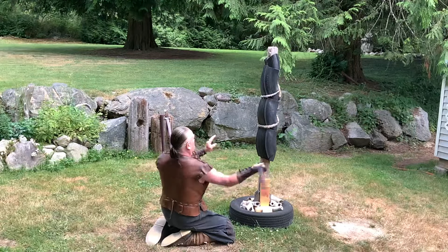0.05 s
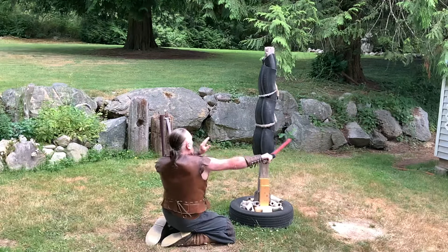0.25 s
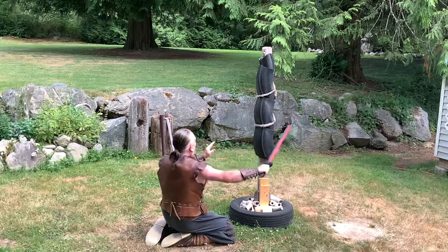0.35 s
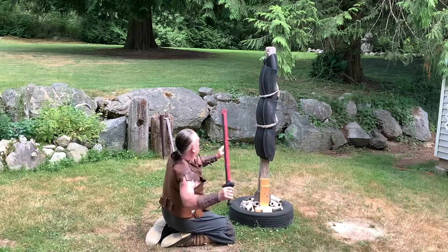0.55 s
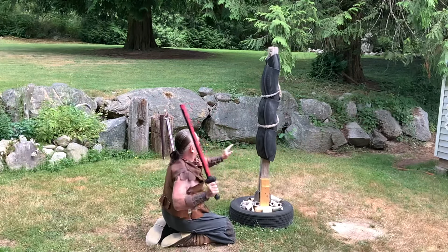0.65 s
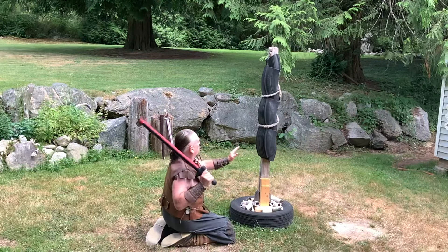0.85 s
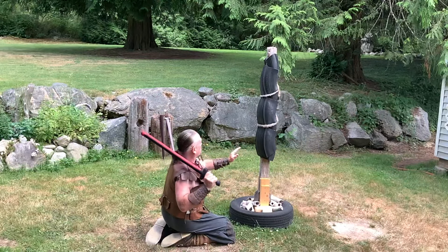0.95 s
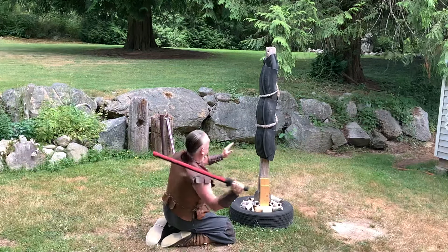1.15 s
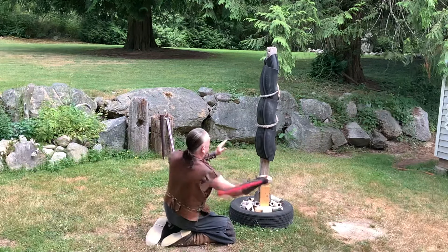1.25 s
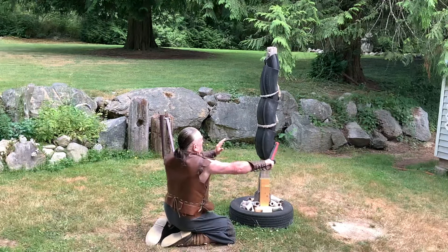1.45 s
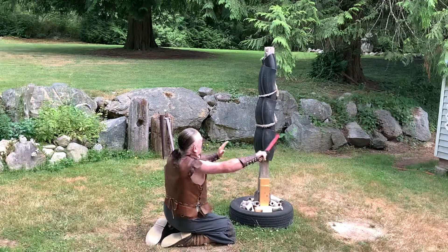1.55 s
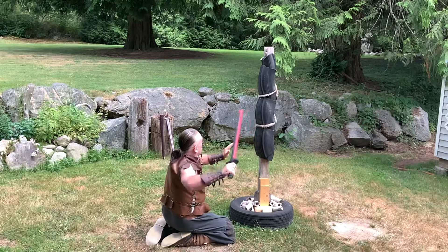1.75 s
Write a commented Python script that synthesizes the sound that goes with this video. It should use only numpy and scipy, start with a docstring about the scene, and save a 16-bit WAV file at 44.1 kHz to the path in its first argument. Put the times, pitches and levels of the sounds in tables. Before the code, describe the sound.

Two sharp smacks of a practice sword land on a padded post outdoors, the second brighter. After each, the post rings briefly and knocks softly in its tyre base, with a faint rumble and hiss behind.

```python
"""Two sharp slaps, each with a short ring and a soft knock after it, over low rumble and a faint
background hiss whose treble drops out and comes back.
A practice sword hits a padded wooden post on an open lawn. Each blow grazes the cover, slaps the
padding and rings post and blade; the cover cracks as the padding bottoms out, and the post rocks in
its tyre base. Rocks, trees and a house wall scatter the sound."""
import sys
import numpy as np
from scipy import signal
from scipy.fft import rfft, irfft
from scipy.io import wavfile

SR = 44100
rng = np.random.default_rng(int(sys.argv[2]) if len(sys.argv) > 2 else 0)


def inscribe(sig):
    """Save sig as 16-bit PCM at rate SR to the path in sys.argv[1].

    A 1-D sig is mono; a 2-D sig holds one channel per row.
    Samples are clipped to [-1, 1] before scaling.
    """
    pcm = np.round(np.clip(np.atleast_2d(sig).T, -1, 1) * 32767)
    wavfile.write(sys.argv[1], SR, pcm.astype(np.int16))


N = 79380

# microphone pair: freq_hz, left_right_db, left_lead_rad, near_coherence, scattered_coherence
MIC_PAIR = [(90, -0.5, -0.01, 0.91, 0.97), (280, -1.5, 0.44, 0.92, 1), (550, -0.5, 1, .9, .55),
            (1050, 2.5, -0.44, 0.22, .25), (2100, -4, -2, 0.85, 0.067), (4000, -4, -1.25, .2, .15),
            (7000, 0.5, -1.5, .15, 0.21), (14000, 0, 4, 0.24, .15)]
# background spectra: freq_hz, density_db
RUMBLE_COLOUR = [(20, -17), (40, -9), (60, -4), (80, -3.5), (130, -11), (250, -26.5), (600, -40)]
MID_HISS_COLOUR = [(100, -2.5), (400, 1), (1000, 3), (1500, -5.5), (2400, -0.5), (4000, -14.5), (7000, -27),
                   (15000, -17.5)]
TREBLE_HISS_COLOUR = [(300, -17), (1000, -6), (1500, -2.5), (3200, 0), (5500, -8), (9000, -9.5),
                      (14500, -6.5), (16000, -21)]
# background hiss levels: time_s, level_db
MID_HISS_LEVEL = [(0, -69.5), (.2, -64.5), (.45, -60.5), (.62, -61.5), (1.0, -71), (1.11, -72.5),
                  (1.219, -64.5), (1.42, -67.5), (1.8, -62.5)]
TREBLE_HISS_LEVEL = [(0, -91), (.1, -79.5), (.17, -67), (0.299, -57.5), (.48, -99), (0.538, -60.5),
                     (.64, -57.5), (.85, -63), (1.01, -65), (1.1, -81), (1.21, -69), (1.29, -78.5),
                     (1.41, -67), (1.67, -71), (1.73, -76), (1.8, -71)]  # drops out and comes back
# small noises: start_s, level_db, rise_s, t60_s
KNOCKS = [(.327, -39, 0.0015, 0.076), (.35, -48.5, 0.003, 0.26), (1.599, -41, 0.0025, 0.17),
          (1.636, -53, 0.0023, 0.27)]
RUBS = [(.405, -59.5, 0.00062, 0.036), (1.217, -59.5, .002, 0.065), (1.597, -46.5, 0.0068, 0.11)]  # blade cover and grip
RUSTLE = [(1.675, -63, .07, 3)]  # sword drawn back
SQUEAK = [(1.188, -60, .026, .1)]
# their spectra: freq_hz, density_db
KNOCK_COLOUR = [(60, -22), (150, -13), (260, 3.5), (400, -5), (750, -4.5), (1300, -12.5), (2200, -15),
                (5000, -24), (9000, -42), (16000, -48)]
RUB_COLOUR = [(200, -18.5), (1500, -9), (3300, -4.5), (5500, -15), (9000, -10), (14500, -8), (16500, -16)]
RUSTLE_COLOUR = [(2000, -37), (4200, -5), (5300, 5), (6700, 1.5), (7900, -3.5), (9000, -37), (16000, -32)]
SQUEAK_COLOUR = [(1300, -46), (1530, -16), (1610, 2), (1700, -12), (2000, -50)]
# low bumps after the blows: start_s, pitch_hz, level_db, rise_s, t60_s
BUMPS = [(.328, 281, -42.5, 0.008, 0.036), (0.486, 237.6, -54.5, 0.011, 0.19),
         (0.521, 302.6, -57, 0.0061, .2), (0.512, 130, -56.5, .02, 0.15), (.67, 150, -57.5, 0.0138, 0.15),
         (1.599, 259, -37.5, 0.0096, 0.067), (1.635, 246.7, -43.5, 0.0027, 0.15)]
# garden echoes: freq_hz, density_db, t60_s
SCATTER_BANDS = [(70, -24.5, 0.3), (150, -6, 0.29), (280, 3.5, .24), (410, 1, 0.27), (620, 0, .22),
                 (960, 2, .22), (1410, -8.5, 0.2), (2300, -4, 0.18), (3400, -13, 0.18), (5000, -17.5, 0.22),
                 (7600, -24.5, .2), (11060, -29.5, .2), (16000, -28.5, 0.19)]
# post and blade modes: pitch_hz, t60_s, left_right_db, first_blow_db, second_blow_db
MODES = [(170, .12, 0, -38, -24.5), (281.5, 0.057, -0.5, -12, -14.5), (300.8, .2, 0, -30, -37),
         (478, .08, 2.5, -19, -21.5), (523, 0.054, -2, -27, -16.5), (641.5, .1, 4, -18, -17),
         (854.5, .17, 2, -26, -25), (880, 0.057, 7.5, -13.5, -24), (1033, 0.15, 4.5, -24.5, -22),
         (1121, .14, 4, -32.5, -25.5), (1753, .14, -5.5, -31.5, -28.5), (2162, 0.27, -4, -32.5, -27.5),
         (2296, 0.12, -6, -27.5, -27.5), (2450, .07, -8.5, -32.5, -23), (3165, .11, -6, -32.5, -33),
         (3385, .1, -1.5, -38.5, -27)]
# spectra of the parts of a blow: freq_hz, density_db
SWISH_COLOUR = [(80, -6), (250, -3.5), (700, -10.5), (2300, -8.5), (5000, -19), (15000, -30.5)]
GRAZE_COLOUR = [(100, -31.5), (300, -2), (600, 1.5), (900, -0.5), (2000, -7), (4500, -8.5), (7000, -17),
                (11000, -13), (14500, -17.5), (16500, -29)]
SLAP_COLOUR = [(100, -37), (300, -17), (600, -8.5), (950, -2), (1400, -3.5), (2400, 0), (3600, -5),
               (5200, -10), (7500, -17.5), (11000, -17.5), (14500, -18), (16500, -29)]
CRACK_COLOUR = [(300, -16), (1500, -3), (4000, 1.5), (7000, -10), (10000, -5.5), (14000, -2), (16000, -13)]
BASE_COLOUR = [(20, -15.5), (40, -6.5), (60, -4), (90, -7.5), (130, -10.5), (220, -22), (600, -58.5)]
# sword blows: start_s, slap_db, slap_rise_s, slap_t60_s, tilt_db_per_octave, graze_lead_s, graze_db,
# ring_lead_s, push_s, crack_lag_s, crack_db, scatter_db, base_db
BLOWS = [(0.2275, -20.5, .0025, .05, -0.5, .0049, -21, .0022, 0.0074, .0025, -29, -24.5, -39),
         (1.4755, -16, 0.00054, 0.031, 1.5, 0.005, -38, -.0002, 0.0075, 0.00246, -20.5, -22, -39.5)]

TIME_S = np.arange(N) / SR
SIDE = np.array([[.5], [-.5]])  # left, right


def undb(db):
    """Decibels to amplitude."""
    return 10 ** (np.asarray(db) / 20)


def across(table, column=1):
    """Table column interpolated over all FFT bins, in log frequency."""
    rows = np.array(table, float)
    return np.interp(np.log(np.arange(N // 2 + 1) * SR / N + 1), np.log(rows[:, 0]), rows[:, column])


def mic_spectra(colour, near):
    """Spectra of coloured noise, partly coherent between the two microphones."""
    coherence = np.clip(across(MIC_PAIR, 3 if near else 4), 0, 1)
    shared, own = rfft(rng.standard_normal(N)), rfft(rng.standard_normal((2, N)))
    white = np.sqrt(coherence) * shared + np.sqrt(1 - coherence) * own
    placement = undb(SIDE * across(MIC_PAIR)) * np.exp(1j * SIDE * across(MIC_PAIR, 2))
    gain = undb(across(colour))
    return white * placement * gain / np.sqrt(np.mean(gain ** 2))


def noise(colour, near=True):
    """Coloured stereo noise, rms near 1."""
    return irfft(mic_spectra(colour, near), N)


def envelope(start_s, rise_s, t60_s):
    """Smooth rise, exponential decay."""
    age_s = np.maximum(TIME_S - start_s, 0)
    attack = np.sin(np.pi / 2 * np.minimum(age_s / rise_s, 1)) ** 2
    return attack * np.exp(-np.log(1000) * np.maximum(age_s - rise_s, 0) / t60_s)


def mode(start_s, pitch_hz, rise_s, t60_s, lead_rad=0):
    """One damped sine."""
    return envelope(start_s, rise_s, t60_s) * np.sin(2 * np.pi * pitch_hz * (TIME_S - start_s) + lead_rad)


def background(rumble_db=-66.5, hum_db=-59, hum_hz=60):
    """Steady rumble and hum; faint, uneven hiss whose treble drops out and comes back."""
    out = undb(rumble_db) * noise(RUMBLE_COLOUR) + undb(hum_db) * np.sin(2 * np.pi * hum_hz * TIME_S)
    for colour, curve in ((MID_HISS_COLOUR, MID_HISS_LEVEL), (TREBLE_HISS_COLOUR, TREBLE_HISS_LEVEL)):
        level_db = np.interp(TIME_S, *np.array(curve).T)
        out += undb(level_db) * noise(colour, near=False)
    return out


def small_noises():
    """Noise bursts: soft knocks, rubs of cover and grip, a high rustle, a faint rough squeak."""
    out = 0
    for events, colour in ((KNOCKS, KNOCK_COLOUR), (RUBS, RUB_COLOUR),
                           (RUSTLE, RUSTLE_COLOUR), (SQUEAK, SQUEAK_COLOUR)):
        for start_s, level_db, rise_s, t60_s in events:
            out += undb(level_db) * noise(colour) * envelope(start_s, rise_s, t60_s)
    return out


def low_bumps():
    """Low bumps after the blows, one mode each."""
    return sum(undb(level_db) * mode(start_s, pitch_hz, rise_s, t60_s)
               for start_s, pitch_hz, level_db, rise_s, t60_s in BUMPS)


def garden_scatter(start_s, lag_s=.0053, rise_s=.008, echoes_per_s=1200, unevenness=.25):
    """Many small echoes of uneven size; each band decays at its own rate."""
    spectra, out = mic_spectra(SCATTER_BANDS, near=False), 0
    for freq_hz, _, t60_s in SCATTER_BANDS:
        band = across([(row[0], row[0] == freq_hz) for row in SCATTER_BANDS])
        out += irfft(spectra * band, N) * envelope(start_s + lag_s, rise_s, t60_s)
    grain = np.interp(TIME_S * echoes_per_s, np.arange(N), rng.standard_normal(N))
    sizes = np.exp(unevenness * grain)
    return out * sizes / np.sqrt(np.mean(sizes ** 2))


def base_thump(start_s, lag_s=.008):
    """The post rocks in its tyre base."""
    return noise(BASE_COLOUR) * envelope(start_s + lag_s, rise_s=.02, t60_s=.3)


def blade_swish(peak_s, level_db=-41.5, tau_s=.0065):
    """The blade's swish grows up to the blow and fades after it."""
    return undb(level_db) * noise(SWISH_COLOUR) * np.exp(-np.abs(TIME_S - peak_s) / tau_s)


def cover_graze(start_s):
    """The blade grazes the cover just before the slap."""
    return noise(GRAZE_COLOUR) * envelope(start_s, rise_s=.0006, t60_s=.03)


def cover_crack(start_s):
    """The cover cracks as the padding bottoms out."""
    return noise(CRACK_COLOUR) * envelope(start_s, rise_s=.00058, t60_s=.019)


def padding_slap(start_s, rise_s, t60_s, tilt_db_per_octave, pivot_hz=1000):
    """The blade slaps the padding; positive tilt is brighter."""
    colour = [(hz, db + tilt_db_per_octave * np.log2(hz / pivot_hz)) for hz, db in SLAP_COLOUR]
    return noise(colour) * envelope(start_s, rise_s, t60_s)


def post_ring(start_s, push_s, blow_index, trim_db=-3.5, corner_hz=281.5, rise_exponent=.44):
    """Post and blade ring; low modes build up with the padding's push, high ones faster."""
    out = 0
    mic_hz, _, mic_lead_rad, _, _ = np.array(MIC_PAIR).T
    for pitch_hz, t60_s, left_right_db, *blow_db in MODES:
        lead_rad = SIDE * np.interp(pitch_hz, mic_hz, mic_lead_rad)
        rise_s = push_s * min(corner_hz / pitch_hz, 1) ** rise_exponent
        gain = undb(blow_db[blow_index] + trim_db + SIDE * left_right_db)
        out += gain * mode(start_s, pitch_hz, rise_s, t60_s, lead_rad)
    return out


def sword_blows():
    """The sword hits the post; the parts of each blow start milliseconds apart."""
    out = 0
    for index, (start_s, slap_db, slap_rise_s, slap_t60_s, tilt_db_per_octave, graze_lead_s, graze_db,
                ring_lead_s, push_s, crack_lag_s, crack_db, scatter_db, base_db) in enumerate(BLOWS):
        out += blade_swish(start_s)
        out += undb(graze_db) * cover_graze(start_s - graze_lead_s)
        out += undb(slap_db) * padding_slap(start_s, slap_rise_s, slap_t60_s, tilt_db_per_octave)
        out += undb(crack_db) * cover_crack(start_s + crack_lag_s)
        out += post_ring(start_s - ring_lead_s, push_s, index)
        out += undb(scatter_db) * garden_scatter(start_s)
        out += undb(base_db) * base_thump(start_s)
    return out


def scene():
    """Two blows on the lawn, in stereo."""
    return sword_blows() + low_bumps() + small_noises() + background()


def record(dry):
    """Cuts the deepest bass and the top treble."""
    low_cut_hz, high_cut_hz = 38, 15900
    thin = signal.sosfilt(signal.butter(2, low_cut_hz, "high", fs=SR, output="sos"), dry)
    return signal.sosfilt(signal.ellip(8, .2, 70, high_cut_hz, fs=SR, output="sos"), thin)


dry = scene()
out = record(dry)
inscribe(out)
```